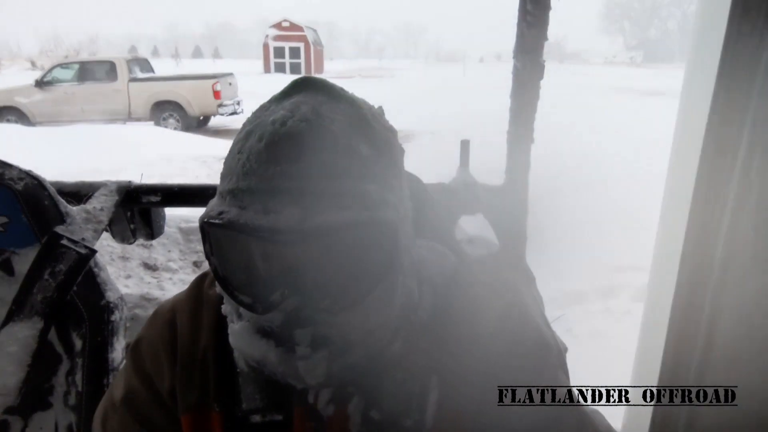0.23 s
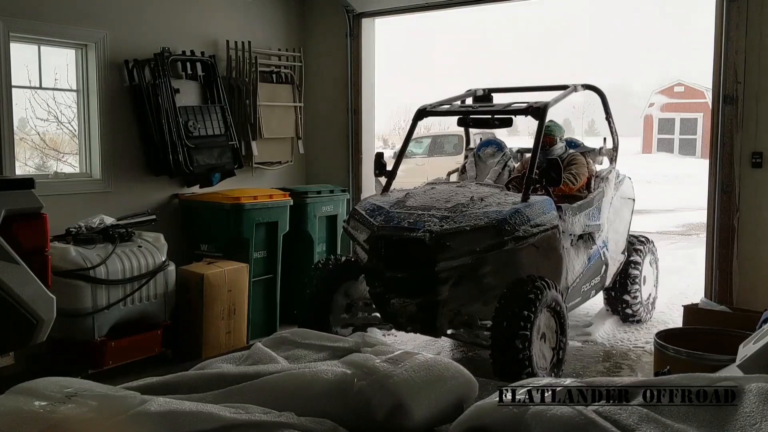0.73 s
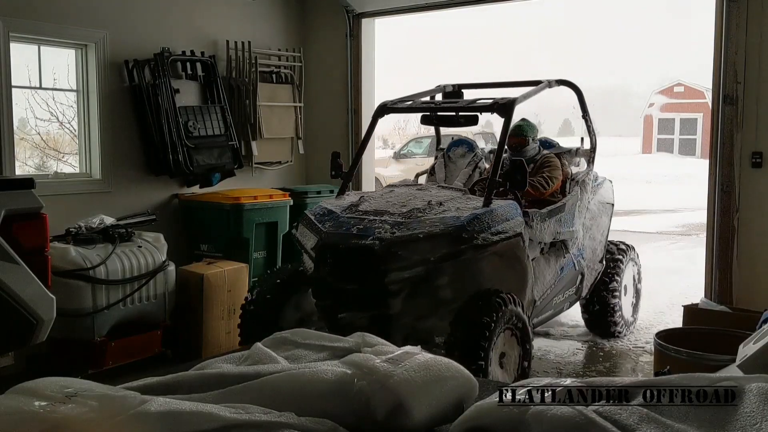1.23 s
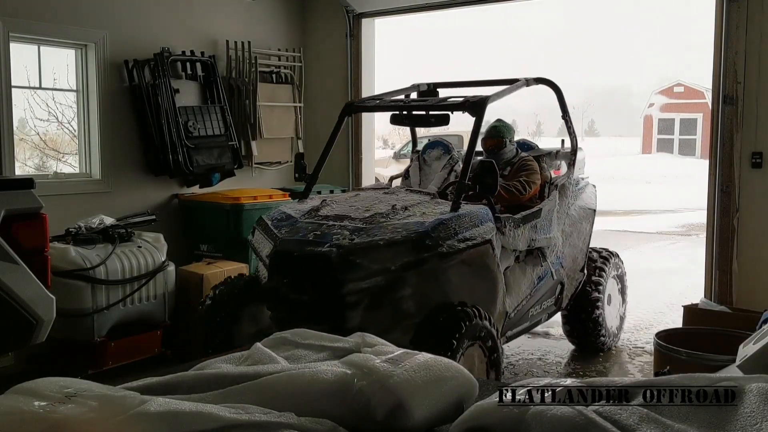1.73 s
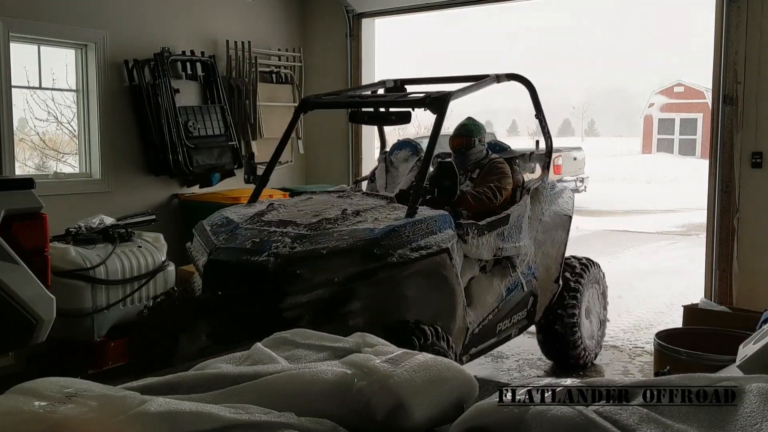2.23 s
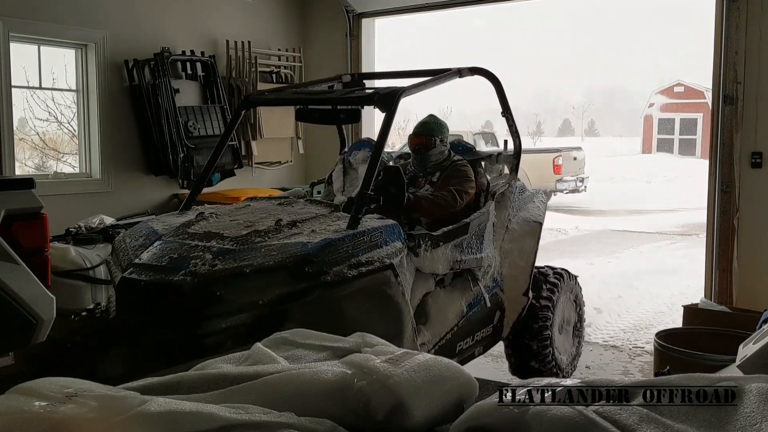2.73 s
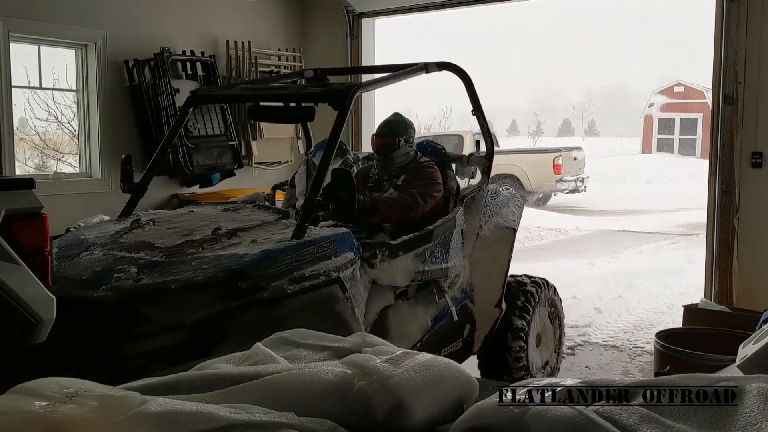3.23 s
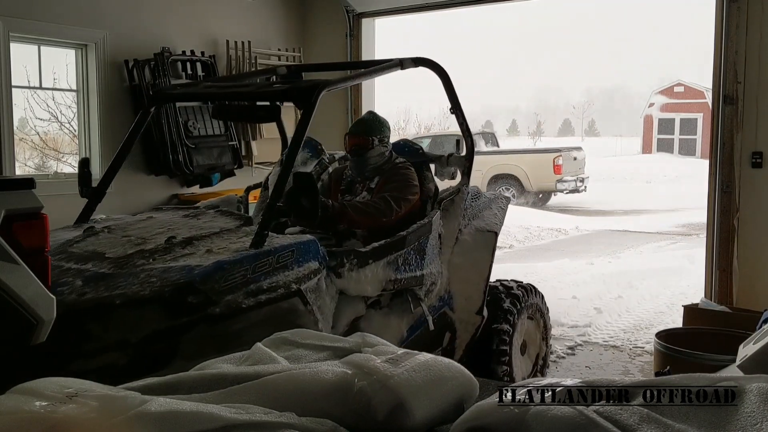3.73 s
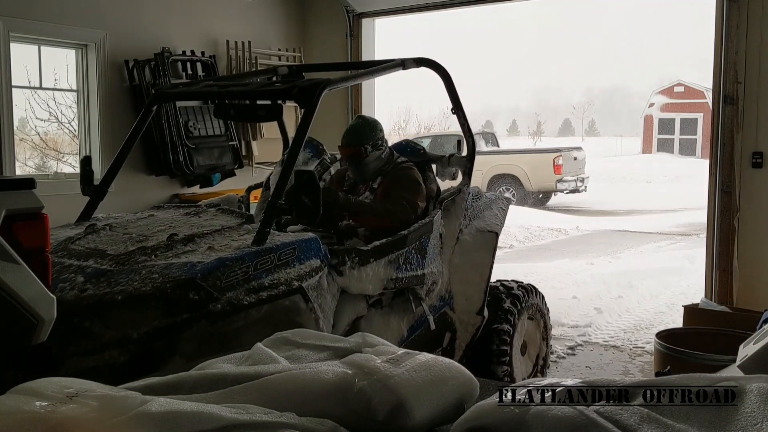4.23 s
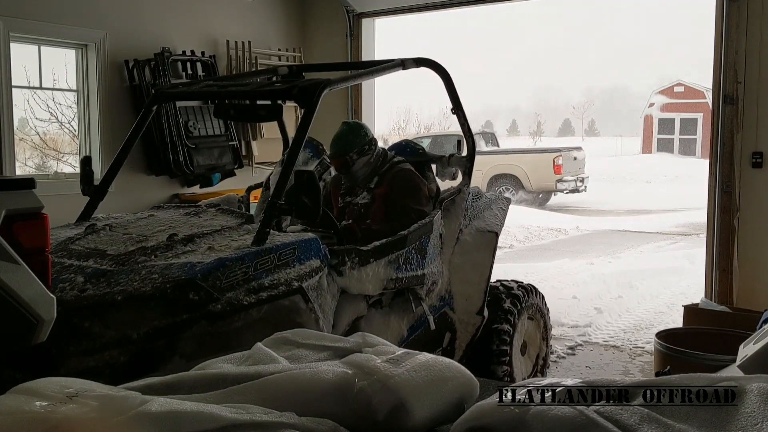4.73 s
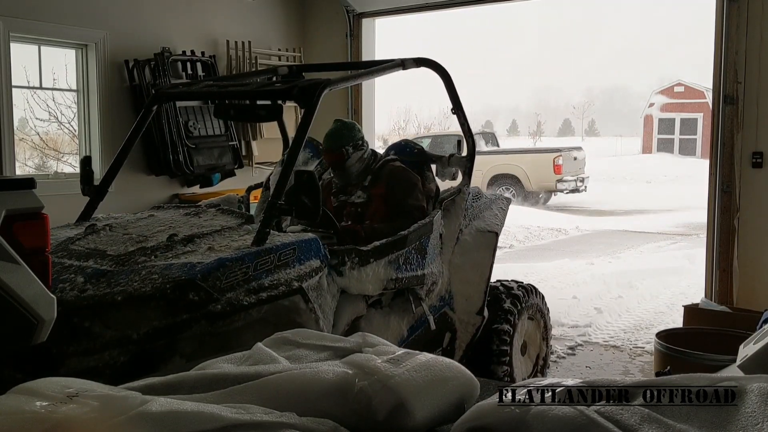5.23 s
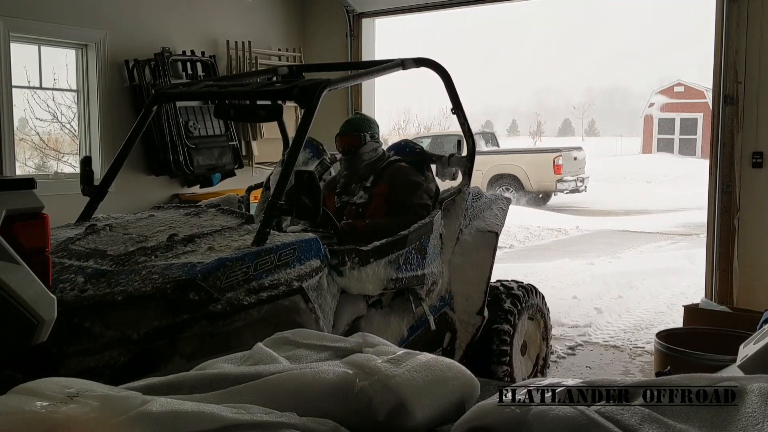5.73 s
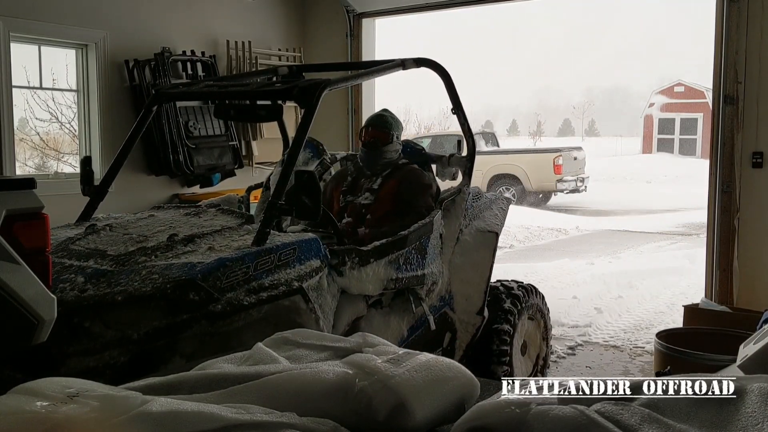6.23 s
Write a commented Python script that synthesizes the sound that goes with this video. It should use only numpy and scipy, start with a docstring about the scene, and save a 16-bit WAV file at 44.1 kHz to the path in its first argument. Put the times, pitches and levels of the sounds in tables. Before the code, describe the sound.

From 0 to 0.47 s we sit in an open off-road vehicle: an uneven twin-cylinder engine throbs close by, slowing, while low wind buffets and bright blown snow patters. A small dry click cuts abruptly to a quieter garage. The exhaust putters outside the open door, revs up around 0.65-0.9 s with a raspy edge, then drops toward 1.5 s amid faint gritty scraping. A second throttle push at about 1.7 s brings it through the door; the exhaust swells into a deep room boom, with growl, intake bark, valve clatter, hiss and a thin belt whine until about 2.5 s. Snow crunches near 1.8, 2.3 and 2.8 s; brief belt notes sing until 3.4 s as the engine slows. From 3.5 s it idles in lumpy pulses, about ten paired firings a second, hunting slightly. Two short scrapes come near 5.2-5.3 s, left of centre; idle continues to 6.4 s.

```python
"""First the seat of a vehicle in a snowy wind: an uneven-firing twin throbs, wind buffets, blown snow patters.
At 0.47 s a click cuts to a garage: the exhaust putters beyond the door, then booms in the room as it creeps in.
Two pushes of throttle bring a rasp; the belt drive sings and snow scrapes; at last the engine hunts and idles.
Timed pulses ring resonances for exhaust, intake bark and valve taps; coloured noise makes wind, snow, hiss
and rumble; wavering sines make the belt notes."""
import sys
import numpy as np
from scipy import signal
from scipy.fft import rfft, irfft, next_fast_len
from scipy.io import wavfile
from scipy.ndimage import uniform_filter1d

SR = 44100
rng = np.random.default_rng(int(sys.argv[2]) if len(sys.argv) > 2 else 0)


def put_to_file(sound):
    """Save the sound as 16-bit audio at rate SR, in the file named by the first command-line argument."""
    columns = np.atleast_2d(sound).T  # one column per channel
    safe = np.clip(columns, -1, 1)
    whole_steps = np.round(safe * 32767)
    wavfile.write(sys.argv[1], SR, whole_steps.astype(np.int16))


N = 285327

TIME = np.arange(N) / SR
PADDED = next_fast_len(N + SR, real=True)
FREQ = np.maximum(np.arange(PADDED // 2 + 1) * SR / PADDED, 1)
TOP_HZ = 15800

# the cut between the two places: moment, fade length, level of its click
CUT_S, CUT_FADE_S, CLICK_DB = 0.474, .0025, -15
# the engine passes the door at this moment; a larger second value makes the passage slower
ENTERS_S, ENTERING_S = 1.72, 0.23

# engine speed on the ride, in four-stroke cycles [t/s, cycle rate f/Hz]
RIDE_SPEED = [(0.0, 16.04), (0.15, 15.85), (0.28, 15.2), (0.38, 13.97), (0.47, 12.1)]
# engine speed in the garage: up to the door, over the sill, a slow creep, then idle [t/s, cycle rate f/Hz]
GARAGE_SPEED = [(0.49, 16.31), (0.63, 17.19), (0.83, 19.95), (1.49, 11.86), (1.61, 12.58), (1.73, 16.05),
                (1.87, 17.62), (2.05, 17.41), (2.22, 17.52), (2.45, 15.01), (2.76, 12.105), (3.17, 12.146),
                (3.52, 10.6), (3.89, 10.2), (4.67, 10.027), (4.88, 10.73), (5.18, 9.9), (5.28, 10.18),
                (6.33, 10.206), (6.47, 9.87)]
IDLE_HZ = 10.2
# once the throttle shuts the idle hunts: start, time of a crest, period, depth, time constant of its dying away
SETTLES_S, HUNT_CREST_S, HUNT_PERIOD_S, HUNT_DEPTH_HZ, HUNT_DECAY_S = 3.3, 3.68, .42, .25, 2.0
# the boom swells and sags as the speed strays this far from idle, a moment before the flywheel follows
HUNT_HZ, HUNT_DB, FLYWHEEL_LAG_S = 0.2, 2.5, 0.0054
# the boom drops while the engine coasts down at this rate
COAST_HZ_PER_S, COAST_DB = 16.8, -3.5
# pushes of the throttle [t/s, length/s, opening/0-1]
THROTTLE_PUSHES = [(0.652, 0.28, 1), (1.665, 0.5, 1)]
THROTTLE_OPEN_S, THROTTLE_CLOSE_S = 0.24, 0.26

# the two firings of a cycle, close together [place/share of a cycle, level/dB]
FIRINGS = [(0, 0), (.231, 0)]
# gulps of the air intake, ahead of the firings [place/share of a cycle, level/dB]
INTAKES = [(0.73, -4), (0.021, -1)]
# valve and gear taps [place/share of a cycle, level/dB]
VALVE_TAPS = [(0, -1), (.12, -26), (.24, -1), (.41, -0.5), (0.597, -32), (0.743, -5), (0.882, -4.5)]
# point in the cycle at which each place starts, before the first cylinder fires (share of a cycle)
RIDE_START, GARAGE_START = .118, .25
# no two cycles are quite alike: the spread of the crank's wandering ahead and behind (share of a cycle)
CRANK_WAVER = .007
# level of the turbulence in each gulp of gas, as a ratio to its pulses
GULP_GAS = .33

# low modes of the garage that the firings boom in [f/Hz, width/Hz, level/dB]
BOOM_MODES = [(20.8, 27, -11.5), (27.8, 13, -3.5), (41.2, 4.7, -3), (52.35, 6, -5), (71.3, 9.2, -5),
              (93.13, 8.7, 5), (112.4, 17, -10.5), (150, 57, -23.5)]
# tailpipe resonances added to the boom as the throttle opens [f/Hz, width/Hz, level/dB]
PIPE_MODES = [(69.1, 17.5, 9), (120.2, 3.3, -1), (193.8, 21, -4.5)]
# the exhaust heard through the open door [f/Hz, width/Hz, level/dB]
DOORWAY_MODES = [(38, 5.7, 8), (56, 4.7, 4), (70.8, 14, 1), (99.8, 16.5, 3), (118.7, 6.1, -4),
                 (146.6, 20, -16), (192.6, 21, -23)]
# out there it arrives late and putters unevenly
DOORWAY_LAG_S, PUTTER_UNEVEN_DB = 0.02217, 2.2
# the silencer's chug [f/Hz, width/Hz, level/dB]
CHUG_MODES = [(133.9, 16, 3), (154.9, 16, 2.5), (170.7, 17.5, 1), (192.4, 10.3, 4), (215.3, 24.3, -2)]
# the bark of the air intake [f/Hz, width/Hz, level/dB]
BARK_MODES = [(241, 12, -5.5), (263.9, 20, 4), (304, 14, 8), (322.6, 15, 6.5), (350, 6.2, -1.5)]
# chug and bark as the vehicle moves in through the standing waves [t/s, chug level/dB, bark level/dB]
EXHAUST_LEVELS = [(.5, -42, -45), (.66, -62, -45.5), (0.70, -42, -43), (.82, -48, -42), (.89, -54, -47),
                  (.97, -47, -44), (1.0, -44, -38.5), (1.04, -39, -45), (1.35, -58, -52),
                  (1.55, -47.5, -48.5), (1.85, -33.5, -36.5), (2.25, -32, -34), (2.42, -35.5, -38.5),
                  (2.55, -52, -39.5), (2.85, -38.5, -47), (3.15, -37.5, -44.5), (3.6, -42.5, -41),
                  (5.1, -42, -42.5), (5.6, -43, -38.5), (6.47, -42.5, -42)]

# spectrum of the exhaust's rasp under throttle [f/Hz, level/dB]
GROWL = [(230, -44), (340, -12), (385, -15), (435, 2.5), (470, -0.5), (520, 5.5), (585, -24), (648, 0.5),
         (720, -13.5), (900, -42), (1500, -10.5), (1900, -31), (4000, -74)]
# spectrum of valves and gears [f/Hz, level/dB]
CLATTER = [(220, -21), (380, 3.5), (443, -9), (510, -1), (570, -5.5), (650, -3), (740, -7), (800, -1),
           (890, -8), (995, 0), (1180, -15.5), (1480, -5), (1800, -17.5), (2600, -19.5), (4400, -93)]
# spectrum of belt and tyre hiss [f/Hz, level/dB]
HISS = [(1060, 1), (1800, -6), (2520, 0), (3930, -5.5), (4310, -5), (4720, -10), (5560, -6.5),
        (6540, -14.5), (7430, -13), (8590, -20.5), (9500, -15), (10500, -22), (12400, -24), (13900, -23.5),
        (15800, -24)]
# layer levels [idle indoors/dB, added outside/dB, added at full throttle/dB, per doubling of speed/dB]
BOOM_LAW = (-24, -8.5, 3, -0.5)
# the same four columns for the growl [dB each]
GROWL_LAW = (-61.5, -12, 5, 19)
# the same four columns for the clatter [dB each]
CLATTER_LAW = (-50.5, -7.5, -5.5, 7.5)
# the same four columns for the hiss [dB each]
HISS_LAW = (-48, -4.5, 0.5, 4)

# notes of the belt drive while rolling [t/s, length/s, f/Hz, level/dB, left minus right/dB]
WHINES = [(.05, .11, 393, -39, 0), (1.38, .26, 490, -58.5, 4), (1.9, .62, 505, -52, 4),
          (2.8, .14, 492, -46, 4), (3.04, .16, 491, -44, 4), (3.25, .09, 496, -52, 4),
          (3.28, .11, 418, -53, 4)]
WHINE_ATTACK_S, WHINE_RELEASE_S = .075, .06
# their unsteadiness (share of the pitch, share of the level)
WHINE_WAVER, WHINE_THROB = .014, .5

# short gritty scrapes [t/s, level/dB, rise/s, decay/s, left minus right/dB, hollow against grit/dB]
SCRAPES = [(1.15, -55, 0.18, 0.41, 6.4, -4), (1.82, -42, 0.02, 0.13, 6.5, -1),
           (2.3, -51.5, 0.11, 0.25, 4.9, -9), (2.79, -51, 0.039, 0.072, 9.9, 2.5),
           (5.22, -48, 0.02, 0.18, 7.6, 1), (5.29, -40, 0.012, 0.074, 5.8, -12)]
# spectrum of the scraping grit [f/Hz, level/dB]
SCRAPE_GRIT = [(300, -19), (700, -9), (1200, 7.5), (1900, 2), (2800, 8), (4200, 3), (5800, 0.5), (6700, -8),
               (7500, -8), (10000, -15.5), (15000, -37)]
# the hollow of the wheel well under the scrapes [f/Hz, width/Hz, level/dB]
WELL_MODES = [(420, 110, -2), (520, 150, 1), (760, 510, -5)]

# exhaust resonances heard from the seat [f/Hz, width/Hz, level/dB]
SEAT_MODES = [(16.1, 2.7, -25), (42.7, 3.9, -6), (68.1, 20, -5), (81.4, 7.5, 0.5), (112, 10.7, -10.5),
              (127.7, 6.5, -19), (173, 32, -22), (229, 27, -29), (296, 35, -28.5), (380, 91, -48),
              (500, 65, -46), (718, 260, -50.5)]
# levels at the seat; the exhaust's holds at mean speed and grows with the engine
SEAT_EXHAUST_DB, SEAT_DB_PER_HZ, SEAT_WIND_DB, SEAT_SNOW_DB = -13, 1.1, -34.5, -51
# the air noise swells and sags by this much in each cycle
SURGE_DB = 1.2
# gusts on the ride [t/s, half length/s, wind level/dB, blown snow level/dB]
GUSTS = [(0.107, 0.12, 2, 2.5), (0.16, 0.012, 0, 1), (0.462, 0.084, 4.5, 3)]
# spectrum of the wind [f/Hz, level/dB]
WIND = [(76, -46), (130, -5.5), (257, -15), (391, -10.5), (426, -18), (588, -23), (811, -19.5),
        (1080, -31.5), (1510, -32.5), (2500, -44), (3250, -75), (5500, -120)]
# spectrum of the blown snow [f/Hz, level/dB]
SNOW = [(1180, -27), (2000, 1), (2570, 8), (3220, 8.5), (3540, 6), (6000, 1.5), (6480, -3), (7380, 0.5),
        (11500, -2), (15800, -7)]

# spectrum of wind at the open door and of rolling tyres [f/Hz, level/dB]
RUMBLE = [(12, -18), (30, -5), (60, 0), (110, -9.5), (200, -5.5), (400, -27), (900, -85)]
# rumble indoors, and what the packed snow outside adds to it
RUMBLE_DB, RUMBLE_OUTSIDE_DB = -49, 5
# tilt of the garage sound to the left or right [f/Hz, left minus right/dB]
GARAGE_BALANCE = [(60, 2), (110, 4.5), (200, 6), (380, 3.5), (700, 4.5), (1290, 6.5), (2380, -2), (4400, 8),
                  (8120, 12.5), (15000, 16)]


def exhaust(cycles, throttle, outside, boom_db):
    """Paired firings ring the doorway, then the room's modes; gas gulps ring the silencer and intake."""
    firings = strokes(cycles, FIRINGS, scatter_db=.3, jitter_s=.00007)
    boom = filtered(firings, resonances(BOOM_MODES, held=[(44.5, 3.1), (80.5, 2.2)]))
    boom += throttle * filtered(firings, resonances(PIPE_MODES))
    uneven = firings * amp(PUTTER_UNEVEN_DB * walk(25))
    putter = delayed(filtered(uneven, resonances(DOORWAY_MODES)), DOORWAY_LAG_S)
    sound = even((1 - outside) * even(boom) + outside * even(putter)) * amp(boom_db)

    chug_db, bark_db = follow(EXHAUST_LEVELS)
    held = [(hz, 13) for hz, _, _ in CHUG_MODES]
    sound += even(filtered(gulps(cycles, FIRINGS), resonances(CHUG_MODES, held))) * amp(chug_db)
    sound += even(filtered(gulps(cycles, INTAKES), resonances(BARK_MODES))) * amp(bark_db)
    # it reaches the right channel first
    return np.array([delayed(sound, 0.00094), sound])


def gulps(cycles, places):
    """Uneven pulses of gas, with turbulence that bursts at the first place of each cycle and fades."""
    pulses = unit(strokes(cycles, places, scatter_db=1.7, jitter_s=.0002))
    since_first = (cycles - places[0][0]) % 1
    gas = unit(np.exp(-since_first / .3) * rng.standard_normal(N))
    return pulses + GULP_GAS * gas


def growl(cycles, db):
    """Under throttle the firings turn sharp and rasp between the walls, with gas noise among them."""
    firings = strokes(cycles, FIRINGS, scatter_db=1, jitter_s=.00008)
    sharp = garage(firings, t60=.28, wet_db=4)
    # the gas noise fades only slightly through each cycle
    gas = rng.standard_normal((2, N)) * np.exp(-(cycles % 1) / 4.7)
    return even(filtered(sharp + .3 * gas, colour(GROWL))) * amp(db)


def machinery(cycles, clatter_db, hiss_db):
    """Valves and gears tap through each cycle and blur in the room; belt and tyres hiss over them."""
    taps = garage(strokes(cycles, VALVE_TAPS, scatter_db=1.2, jitter_s=.0003), t60=.4, wet_db=11)
    # noise partly shared by both channels
    whir = unit(rng.standard_normal(N) + 1.2 * rng.standard_normal((2, N)))
    clatter = unit(filtered(taps + 0.7 * whir, colour(CLATTER))) * amp(clatter_db)
    airy = 0.34 * taps + rng.standard_normal((2, N))
    hiss = unit(filtered(airy, colour(HISS))) * amp(hiss_db + .5 * walk(40))
    return clatter + hiss


def whine(cycles):
    """The drive sings short, wavering sine notes while the wheels roll, throbbing with each crank turn."""
    notes = np.zeros((2, N))
    waver = 1 + WHINE_WAVER * walk(70)
    for s, length, hz, db, pan_db in WHINES:
        # the left channel lags in phase
        tone = np.sin(2 * np.pi * np.cumsum(hz * waver) / SR - np.array([[1.1], [0]]))
        swell = held_for(s, length, WHINE_ATTACK_S, WHINE_RELEASE_S)
        notes += panned(db, pan_db) * swell * tone
    # two crank turns make one four-stroke cycle
    throb = 1 + WHINE_THROB * np.cos(4 * np.pi * cycles)
    return np.sqrt(2) * notes * throb * amp(1.7 * walk(40))


def scrapes():
    """Crusted snow scrapes: uneven grit swells and fades, with the hollow of the wheel well under it."""
    grit = rng.standard_normal((2, N)) * amp(1.5 * walk(900) + .8 * walk(110))
    crunch = unit(filtered(grit, colour(SCRAPE_GRIT)))
    hollow = unit(filtered(grit, resonances(WELL_MODES)))
    out = np.zeros((2, N))
    for s, db, rise, decay, pan_db, hollow_db in SCRAPES:
        swell = np.exp(-np.maximum(s - TIME, 0) / rise - np.maximum(TIME - s, 0) / decay)
        out += swell * panned(db, pan_db) * (crunch + amp(hollow_db) * hollow)
    return out


def ride():
    """From the seat: the exhaust throbs close by, wind buffets, and blown snow patters."""
    hz, = follow(RIDE_SPEED)
    wind_db, snow_db = SEAT_WIND_DB, SEAT_SNOW_DB
    for s, half, gust_db, flurry_db in GUSTS:
        gust = np.exp(-((TIME - s) / half) ** 2)
        wind_db = wind_db + gust_db * gust
        snow_db = snow_db + flurry_db * gust
    layers = seat_exhaust(hz) + seat_wind(hz, wind_db) + blown_snow(snow_db)
    # slightly to the right
    return layers * amp(np.array([[-.4], [.4]]))


def seat_exhaust(hz):
    """Paired firings ring the resonances heard from the seat, louder as the engine runs faster."""
    # the engine has already been running for three cycles
    lead = int(3 * SR / hz[0])
    running = np.cumsum(np.pad(hz, (lead, 0), "edge")[:N]) / SR - RIDE_START
    firings = strokes(running, FIRINGS, scatter_db=.5, jitter_s=.0001)
    throb = np.roll(filtered(firings, resonances(SEAT_MODES)), -lead)
    level_db = SEAT_EXHAUST_DB + SEAT_DB_PER_HZ * (hz - np.mean(hz[TIME < CUT_S]))
    return even(throb) * amp(level_db)


def seat_wind(hz, db):
    """Low coloured noise, partly shared by both channels, buffets at random."""
    air = unit(rng.standard_normal(N) + 1.13 * rng.standard_normal((2, N)))
    wind = unit(filtered(air, colour(WIND))) * amp(db + 1.0 * walk(31.2))
    # intake and gas noise surge with each pair of firings
    cycles = np.cumsum(hz) / SR - RIDE_START
    return wind * amp(SURGE_DB * np.cos(2 * np.pi * (cycles - .4)))


def blown_snow(db):
    """Bright noise with a fast random flutter patters like flakes."""
    flakes = rng.standard_normal((2, N)) * amp(1.0 * walk(810))
    return unit(filtered(flakes, colour(SNOW))) * amp(db)


def rumble(outside):
    """Wind at the open door and tyres on packed snow rumble under the engine as slowly drifting low noise."""
    level_db = RUMBLE_DB + RUMBLE_OUTSIDE_DB * outside + 1.2 * walk(3)
    return unit(filtered(rng.standard_normal(N), colour(RUMBLE))) * amp(level_db)


def engine_speed():
    """Cycles per second: the driver's course, then a swing round idle that dies away."""
    hz, = follow(GARAGE_SPEED)
    swing = np.cos(2 * np.pi * (TIME - HUNT_CREST_S) / HUNT_PERIOD_S)
    return hz + HUNT_DEPTH_HZ * swing * held_for(SETTLES_S, 0, .2, HUNT_DECAY_S)


def firing_strength(hz):
    """In dB: stronger above idle speed, weaker when the idle sags and when the engine coasts down."""
    coming_hz = np.interp(TIME + FLYWHEEL_LAG_S, TIME, hz)
    slowing = -uniform_filter1d(np.gradient(hz) * SR, size=4410)
    hunting_db = HUNT_DB * np.tanh((coming_hz - IDLE_HZ) / HUNT_HZ)
    return hunting_db + COAST_DB * np.clip(slowing / COAST_HZ_PER_S, 0, 1)


def loudness(law, hz, outside, throttle):
    """A layer's level in dB from the vehicle's place, the throttle and the engine speed."""
    idle_db, outside_db, throttle_db, doubling_db = law
    return idle_db + outside_db * outside + throttle_db * throttle + doubling_db * np.log2(hz / IDLE_HZ)


def still_out(enters_s, entering_s):
    """From 1 to 0 as the vehicle passes the door."""
    return (1 - np.tanh((TIME - enters_s) / (2 * entering_s))) / 2


def strokes(cycles, places, scatter_db, jitter_s):
    """A pulse whenever the engine passes one of the places, with chance in its level and timing."""
    out, count = np.zeros(N), np.arange(-1, int(cycles[-1]) + 1)
    for place, db in places:
        chance = rng.standard_normal((200, 2))[:len(count)]
        # places outside the sound land at -1 s
        passes_s = np.interp(count + place, cycles, TIME, left=-1, right=-1)
        at = ((passes_s + jitter_s * chance[:, 0]) * SR).astype(int)
        heard = (at >= 0) & (at < N)
        out[at[heard]] += amp(db + scatter_db * chance[heard, 1])
    return out


def garage(x, t60, wet_db):
    """The direct sound and a diffuse decaying tail that differs left and right, scaled to rms 1."""
    s = TIME[:SR // 2]
    tail = rng.standard_normal((2, len(s))) * np.exp(-np.log(1000) * s / t60)
    tail *= amp(wet_db) / np.sqrt(np.sum(tail ** 2) / 2)
    tail[:, 0] += 1
    return unit(filtered(x, rfft(tail, PADDED)))


def resonances(modes, held=()):
    """Causal response of steep-sided resonances; sound near each held (Hz, width Hz) arrives late."""
    f = np.arange(SR // 2 + 1.) + 1e-3
    power = 0
    for hz, width, db in modes:
        detuning = (f ** 2 - hz ** 2) / (f * width)
        power = power + amp(2 * db) / (1 + detuning ** 2) ** 2
    # folding the cepstrum gives minimum phase
    cepstrum = irfft(np.log(power + 1e-10))
    cepstrum[0] /= 2
    cepstrum[SR // 2:] = 0
    response = np.exp(rfft(cepstrum))
    # all-pass sections delay without changing the level
    for hz, width in held:
        pole = hz ** 2 - f ** 2 + 1j * f * width
        response *= np.conj(pole) / pole
    return rfft(irfft(response), PADDED)


def colour(points):
    """Response through (Hz, dB) points, straight in dB over log frequency."""
    hz, db = np.transpose(points)
    return amp(np.interp(np.log(FREQ), np.log(hz), db))


def filtered(x, response):
    """Apply a frequency response."""
    return irfft(rfft(x, PADDED) * response, PADDED)[..., :N]


def delayed(x, lag_s):
    """The same sound a little later."""
    return np.interp(TIME - lag_s, TIME, x)


def held_for(start, length, attack, release):
    """Envelope that rises, holds and dies away."""
    rise = np.clip((TIME - start) / attack, 0, 1)
    return rise * np.exp(-np.maximum(TIME - start - length, 0) / release)


def walk(rate):
    """Smoothed random steps, this many a second, with rms 1."""
    k = int(SR / rate)
    steps = np.repeat(rng.standard_normal(N // k + 1), k)
    return unit(uniform_filter1d(steps, k)[:N])


def follow(table):
    """Each column of a curve at every sample."""
    s, *columns = np.transpose(table)
    return [np.interp(TIME, s, c) for c in columns]


def unit(x):
    """Scale to rms 1."""
    return x / np.sqrt(np.mean(x ** 2))


def even(x):
    """Scale to a running rms of 1, keeping the throb within each cycle."""
    k = int(.13 * SR)
    power = uniform_filter1d(uniform_filter1d(x ** 2, k), k)
    return x / np.sqrt(power + 1e-12)


def panned(db, pan_db):
    """Left and right gains for a level and a left-minus-right difference in dB."""
    return amp(db + np.array([[pan_db], [-pan_db]]) / 2)


def amp(db):
    """Decibels to gain."""
    return np.exp(np.asarray(db) * (np.log(10) / 20))


def scene():
    """The ride breaks off with a dry click, and the garage takes over."""
    hz = engine_speed()
    throttle = np.zeros(N)
    for s, length, opening in THROTTLE_PUSHES:
        throttle += opening * held_for(s, length, THROTTLE_OPEN_S, THROTTLE_CLOSE_S)
    outside = still_out(ENTERS_S, ENTERING_S)
    laws = (BOOM_LAW, GROWL_LAW, CLATTER_LAW, HISS_LAW)
    boom_db, growl_db, clatter_db, hiss_db = (loudness(law, hz, outside, throttle) for law in laws)
    # the crank wanders less under throttle
    cycles = np.cumsum(hz) / SR - GARAGE_START + CRANK_WAVER * walk(7) * (1 - throttle)

    inside = exhaust(cycles, throttle, outside, boom_db + firing_strength(hz))
    inside += growl(cycles, growl_db)
    inside += machinery(cycles, clatter_db, hiss_db)
    inside += rumble(outside)
    # over most of the range the left channel hears the vehicle louder
    balance = colour(GARAGE_BALANCE)
    sides = 2 * np.array([balance, np.ones_like(balance)]) / (1 + balance)

    ending = np.clip((CUT_S - TIME) / CUT_FADE_S, 0, 1)
    after = np.clip((TIME - CUT_S) / CUT_FADE_S, 0, 1)
    # a one-sided ramp that snaps back at the cut
    click = amp(CLICK_DB) * uniform_filter1d((1 - ending) * (TIME < CUT_S), size=3)
    return ending * ride() + click + whine(cycles) + after * (filtered(inside, sides) + scrapes())


def record(dry):
    """A steep low-pass removes the treble above TOP_HZ."""
    return signal.sosfilt(signal.ellip(10, .2, 80, TOP_HZ, fs=SR, output="sos"), dry)


dry = scene()
out = record(dry)
put_to_file(out)
```